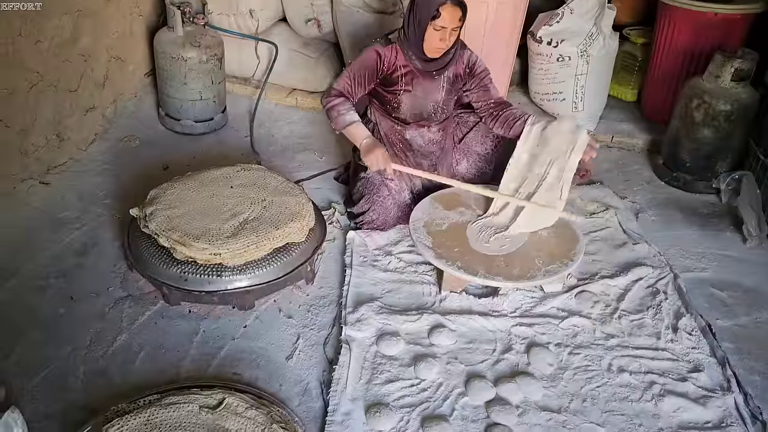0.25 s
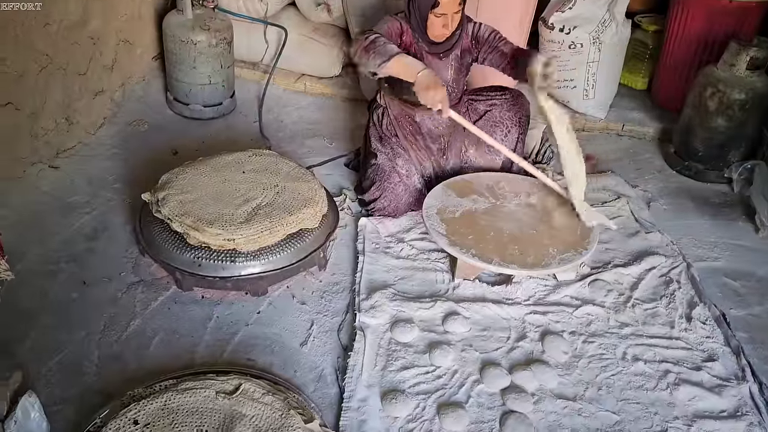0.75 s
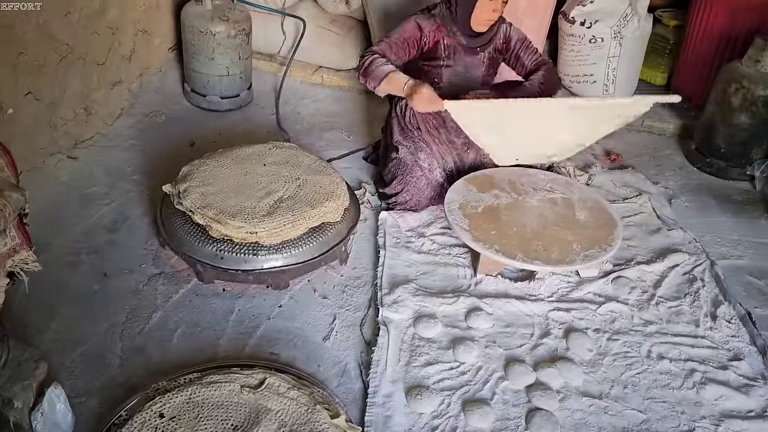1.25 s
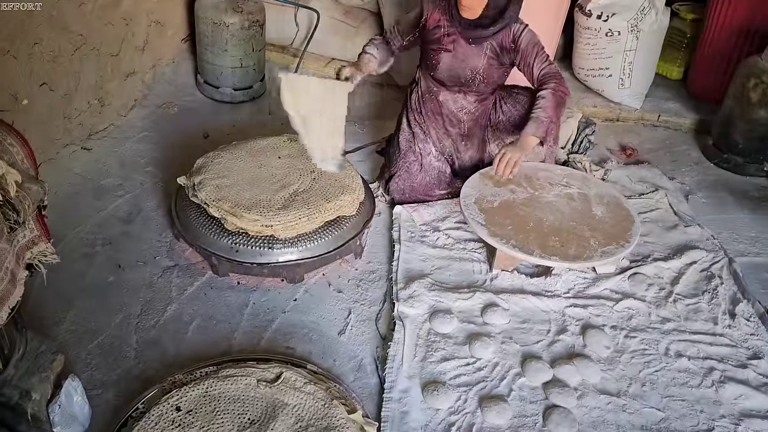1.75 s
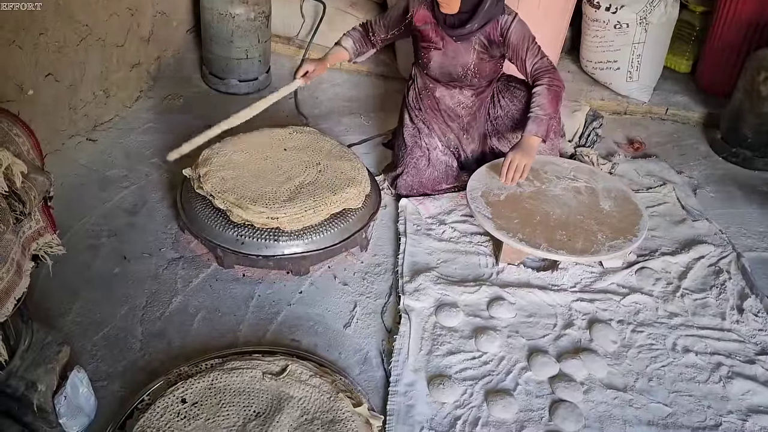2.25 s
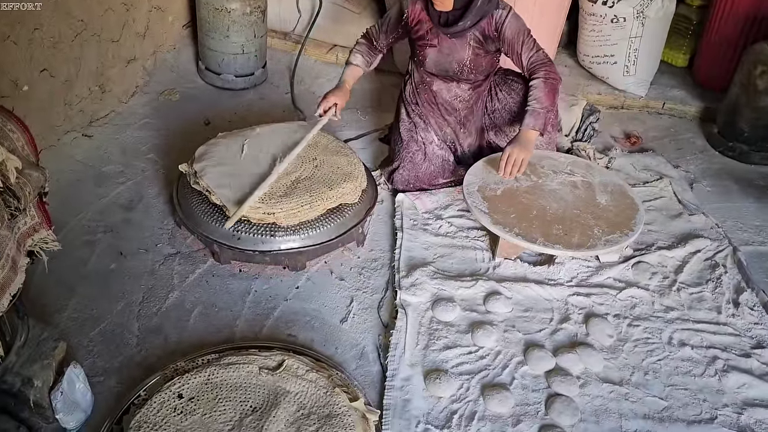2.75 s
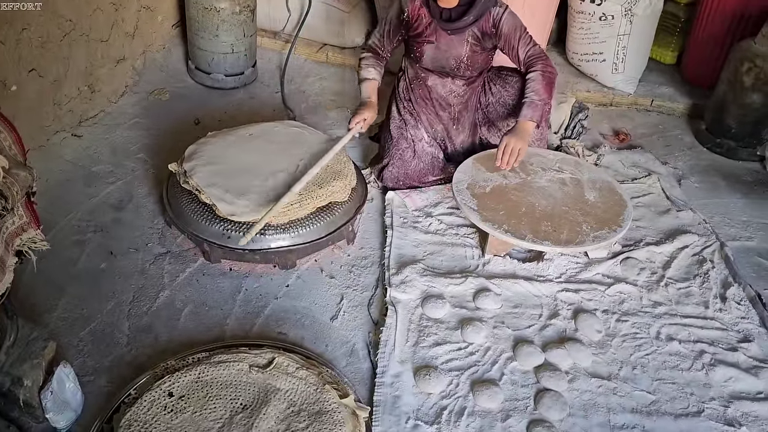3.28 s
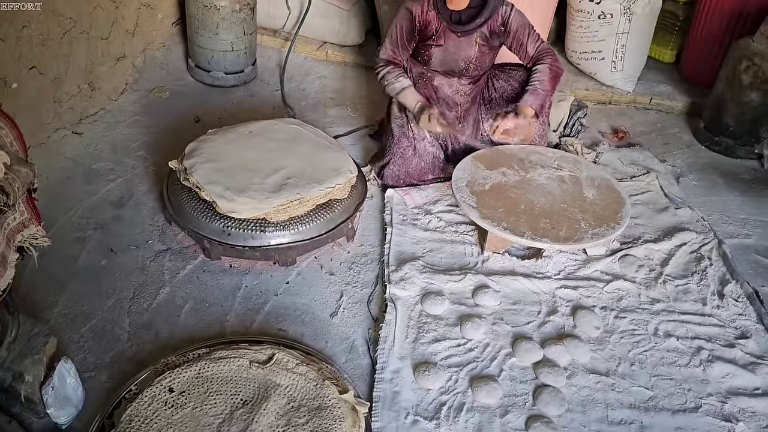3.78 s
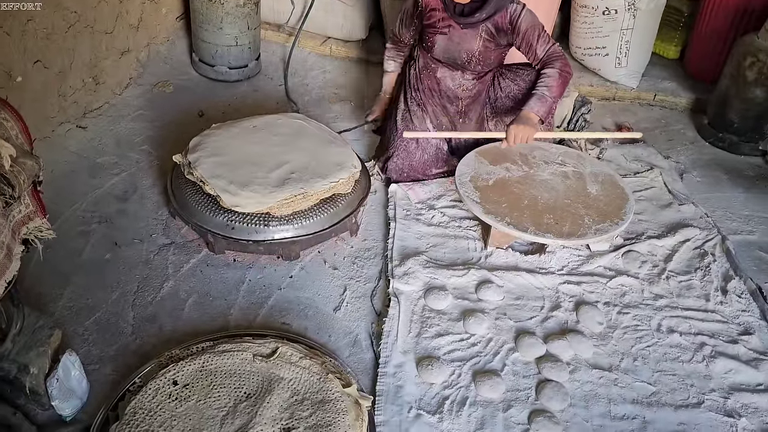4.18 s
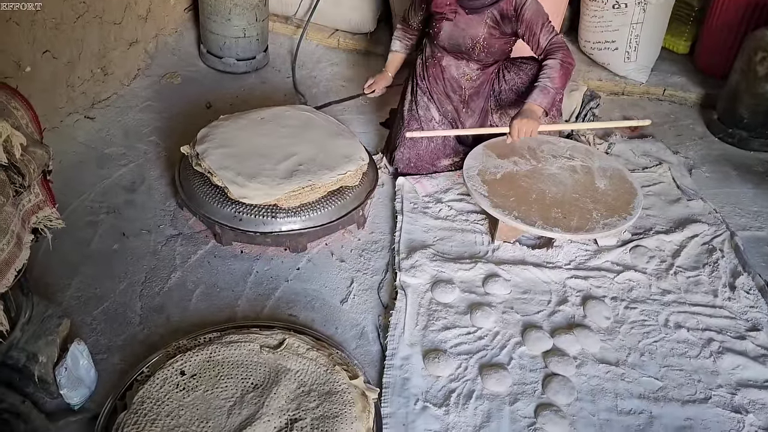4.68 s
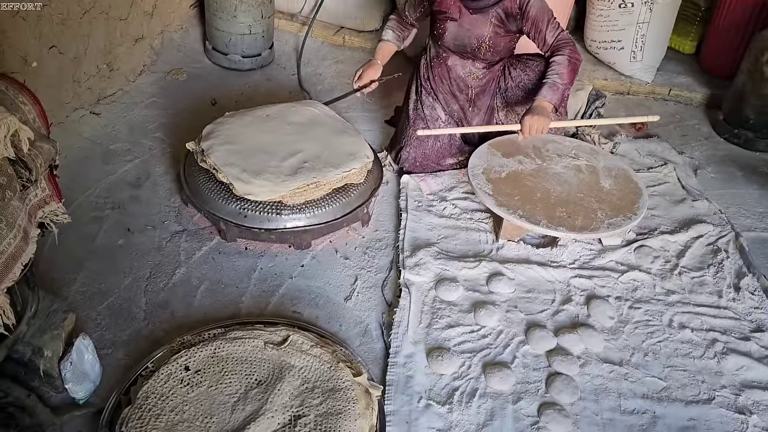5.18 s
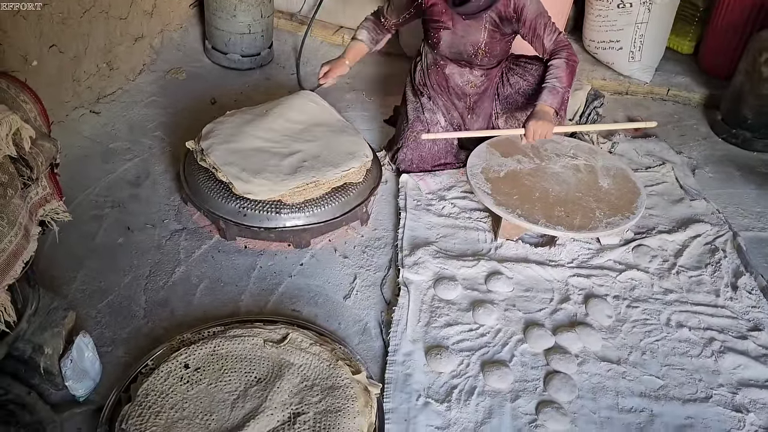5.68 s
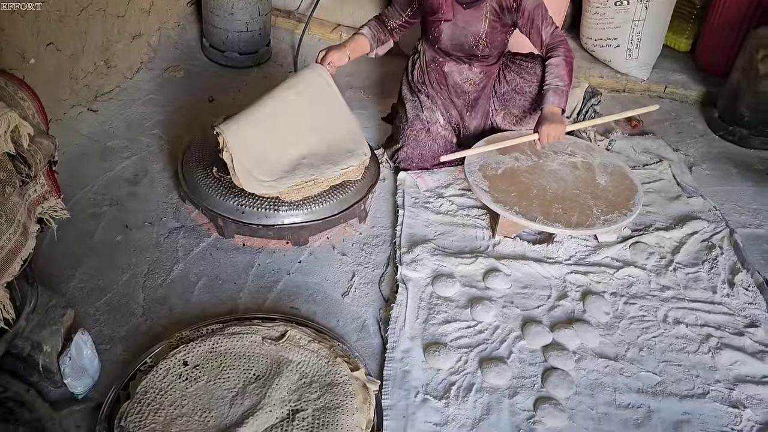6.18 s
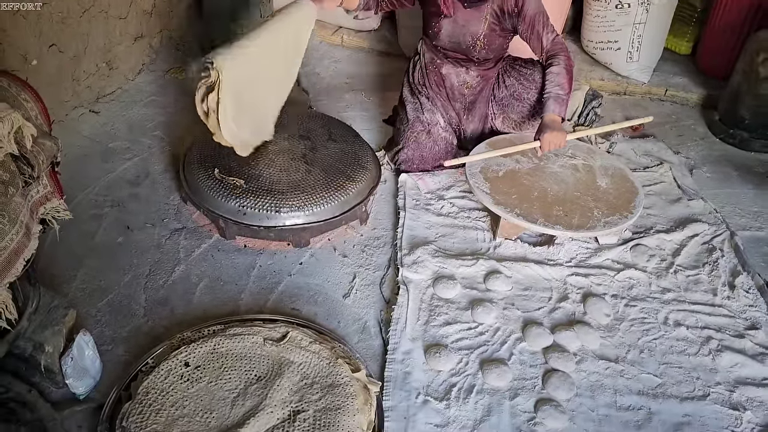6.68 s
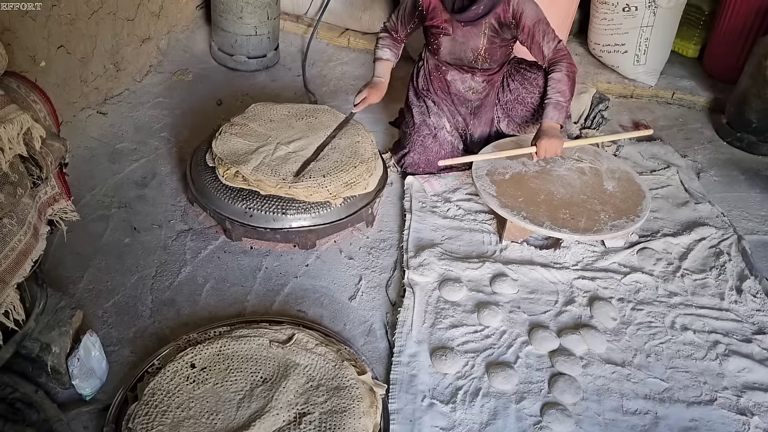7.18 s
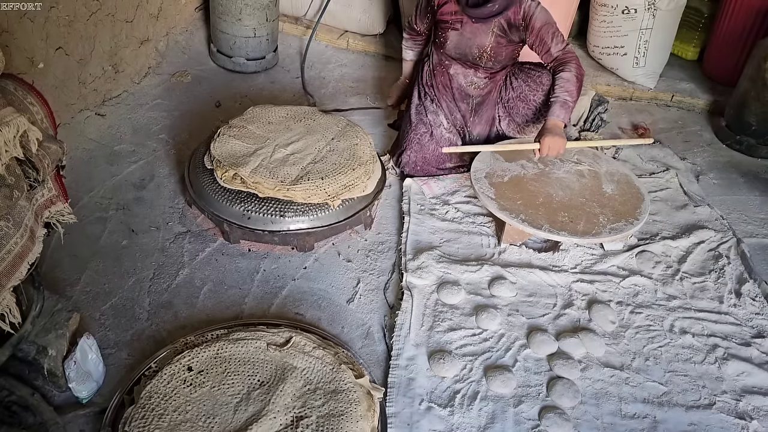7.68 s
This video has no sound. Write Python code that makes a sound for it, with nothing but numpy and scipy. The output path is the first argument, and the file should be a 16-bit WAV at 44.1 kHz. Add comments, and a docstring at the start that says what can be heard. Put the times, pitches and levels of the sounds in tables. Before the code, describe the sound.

In a small hard-walled room with a faint steady gas flame, a thin rolling pin knocks a board and floury dough rustles. A sheet flops softly onto bread, and the pin is set down with dull bumps. A metal blade clanks on an iron griddle and scrapes harshly, making it drone. The bread stack drags up, flaps, then lands with the loudest slap and thump; the blade slides out. Close stereo pickup, bright detail leaning left.

```python
"""Flatbread on a domed iron griddle in a small hard-walled room; a gas burner, coloured noise, runs throughout.
A thin rolling pin knocks on its board (crack plus ringing modes) amid faint ticks of rustling dough; a sheet of
dough slides and flops onto the stack of bread (random grains), the pin ticks the rim and is put down with dull bumps.
A blade strikes the griddle, scrapes under the stack (stick-slip grains) and sets the dome droning. The stack
is dragged up, turned over and lands with a slap and a thump; the blade is drawn out and laid aside."""
import sys
import numpy as np
from scipy import signal
from scipy.fft import rfft, irfft
from scipy.io import wavfile
from scipy.ndimage import uniform_filter1d

SR = 44100
rng = np.random.default_rng(int(sys.argv[2]) if len(sys.argv) > 2 else 0)


def store_wav(level_fs):
    """Save 16-bit WAV to argv[1]."""
    pcm = np.round(np.clip(np.atleast_2d(level_fs), -1, 1) * 32767)
    wavfile.write(sys.argv[1], SR, pcm.T.astype(np.int16))


N = 350138
TIME = np.arange(N) / SR
RING_TIME = np.arange(SR) / SR


def amp(db):
    """Decibels to gain."""
    return 10 ** (np.asarray(db) / 20)


def unit(x):
    """Scales to an rms of one."""
    return x / np.sqrt(np.mean(x ** 2) + 1e-20)


def read(points, hz):
    """Reads a table along log frequency."""
    point_hz, value = np.transpose(points)
    return np.interp(np.log(hz + 1), np.log(point_hz + 1), value)


def level(rows):
    """A dB curve as a gain over time, silent outside its rows."""
    time_s, db = np.transpose(rows)
    inside = (TIME >= time_s[0]) * (TIME <= time_s[-1])
    return amp(np.interp(TIME, time_s, db)) * inside


def add(mix, start_s, sound):
    """Mixes a sound in at start_s."""
    part = mix[round(start_s * SR):][:len(sound)]
    part += sound[:len(part)]


def colour(x, points):
    """Causal minimum-phase filter with the given spectrum; output has unit rms."""
    log_gain = np.log(amp(read(points, abs(np.fft.fftfreq(4096, 1 / SR)))))
    taps = np.fft.ifft(np.exp(np.conj(signal.hilbert(log_gain)))).real
    return unit(signal.oaconvolve(x, taps)[:len(x)])


def resonate(x, resonances):
    """Passes x through parallel resonances."""
    out = 0
    for hz, width_hz, db in resonances:
        b, a = signal.iirpeak(hz, hz / width_hz, SR)
        out = out + amp(db) * signal.lfilter(b, a, x)
    return out


def ring(modes):
    """Dying modes of a struck body."""
    out = 0
    for hz, db, t60_s in modes:
        decay = np.exp(-np.log(1000) * RING_TIME / t60_s)
        out = out + amp(db) * decay * np.sin(2 * np.pi * hz * RING_TIME)
    return unit(out)


def grains(per_s, spread_db):
    """Tiny random slips, a few much larger than the rest."""
    size = amp(spread_db * np.minimum(rng.exponential(1, N), 4))
    sign = rng.choice([-1, 1], N)
    return unit(size * sign * (rng.random(N) < per_s / SR))


def waver(depth_db, size):
    """A random gain, depth_db rms, that drifts over about size samples."""
    return amp(depth_db * unit(uniform_filter1d(rng.standard_normal(N), size=size)))


def stroke(shape, peak_s, db, rise_s, fall_s):
    """Gain of one movement: swells, peaks at peak_s, fades; 20 dB down one rise before and one fall after."""
    away = np.maximum((peak_s - TIME) / max(rise_s, 1e-3), (TIME - peak_s) / max(fall_s, 1e-3))
    gain, near = np.zeros(N), away < 4
    gain[near] = amp(db - 20 * away[near] ** shape)
    return gain


def strokes(rows, shape):
    """Overlapping movements add in power; shape 1 is a pointed swell, 2 round, more a plateau."""
    return np.sqrt(sum(stroke(shape, *row) ** 2 for row in rows))


# likeness of the two channels: hz, likeness_0_to_1
LIKENESS = [(100, 0.93), (300, 0.74), (550, 0.76), (1000, 0.1), (5000, 0.016)]


def diffuse(pair):
    """Two unrelated signals become a field that is alike at both microphones in the bass."""
    a, b = rfft(pair)
    same = np.clip(read(LIKENESS, np.fft.rfftfreq(pair.shape[1], 1 / SR)), 0, 1)
    return irfft(np.array([a, same * a + np.sqrt(1 - same ** 2) * b]), pair.shape[1])


# decay of the reflections: hz, t60_s
ROOM_T60 = [(300, 0.76), (800, 0.2952), (5000, 0.0526), (14000, 0.17)]
# reflected against direct sound: hz, level_db
ROOM_WET = [(100, -10.5), (300, -9), (700, 1.5), (2000, 5)]


def room(x, early_db=4, early_s=0.0086, gap_s=0.0023):
    """Direct sound, dense reflections from floor and near walls, and a short tail."""
    taps = rng.standard_normal((2, SR)) * (rng.random((2, SR)) < 5000 / SR) * (RING_TIME > gap_s)
    taps = diffuse(taps * (1 + amp(early_db) * np.exp(-RING_TIME / early_s)))
    # each band decays at its own rate
    hz, t, bands = signal.stft(taps, SR, nperseg=256)
    bands = bands * np.exp(-np.log(1000) * t / read(ROOM_T60, hz)[:, None])
    tail = rfft(signal.istft(bands, SR, nperseg=256)[1][:, :SR])
    hz = np.fft.rfftfreq(SR, 1 / SR)
    tail = tail / np.sqrt(uniform_filter1d(abs(tail) ** 2, size=600))
    paths = 1 + amp(read(ROOM_WET, hz)) * tail
    paths = paths / np.sqrt(uniform_filter1d(abs(paths) ** 2, size=240))  # keeps each band's energy
    return signal.fftconvolve(x[None], irfft(paths)[:, :SR // 2], axes=1)[:, :N]


def spread(source, count):
    """A wide contact sounds from several spots, each with its own reflections."""
    return sum(room(source()) for _ in range(count)) / np.sqrt(count)


# noise of a contact: hz, level_db
CRACK_COLOUR = [(40, -4), (165, -12.5), (260, 2), (1000, -3), (4800, -2.5), (8000, -7.5), (15000, -12)]


def blows(rows, modes, crack_s, order=3):
    """Each blow is a short crack plus the body's ring; soft contacts lose their treble."""
    out = np.zeros(N)
    for start_s, level_db, bright_hz, crack_to_ring_db in rows:
        crack = colour(rng.standard_normal(SR) * np.exp(-RING_TIME / crack_s), CRACK_COLOUR)
        b, a = signal.butter(order, min(bright_hz, SR / 2 - 1), fs=SR)
        hit = signal.lfilter(b, a, ring(modes) + amp(crack_to_ring_db) * crack)
        add(out, start_s, amp(level_db) * unit(hit) * np.sqrt(.02))  # level counts over 20 ms
    return out


# burner as heard from the moving microphone: time_s, level_db
BURNER_LEVEL = [(0, -56.5), (1.3, -59), (3.1, -62.5), (7.94, -60.5)]
# gas flame: hz, level_db
BURNER_COLOUR = [(25, -12.5), (78, 1.5), (125, -14), (190, -17.5), (250, -8), (400, -22), (690, -17),
                 (850, -2.5), (1020, -6.5), (1250, -16), (3200, -20), (4300, -17.5), (6000, -27),
                 (16000, -34)]


def burner(flutter_db=0.8):
    """Steady gas flame with a slight flutter, spread through the room."""
    flame = diffuse(np.array([colour(rng.standard_normal(N), BURNER_COLOUR) for _ in range(2)]))
    return flame * level(BURNER_LEVEL) * waver(flutter_db, size=2500)


# pin knocks on board, and faint ticks of rustling dough: start_s, level_db, bright_hz, crack_to_ring_db
KNOCKS_AND_TICKS = [(.4275, -31.5, 3130, 1.5), (.5595, -35.5, 1700, 2), (.622, -51, 6000, 18),
                    (.665, -51, 6100, 19), (.8455, -37, 990, 13), (.928, -53.5, 2600, 21),
                    (.957, -61, 6150, 12), (2.292, -50, 1430, 11)]
# modes of pin and board: hz, level_db, t60_s
BOARD_MODES = [(274, -2.5, 0.16), (530, -7, 0.11), (566, -4, 0.17), (834, 3, 0.077), (1130, -1, 0.051),
               (1366, 7, 0.057), (1876, -1, .055), (2250, -7, 0.073), (2870, -9, 0.061)]


def knocks_and_dough_ticks():
    """Knocks excite the quickly damped modes of pin and board; the faint dough ticks are nearly all crack."""
    return blows(KNOCKS_AND_TICKS, BOARD_MODES, crack_s=0.0047)


# dough, cloth, bread and blade slide: peak_s, level_db, rise_s, fall_s, fizz_to_rustle_db
# dough gathered 0.8 s, unrolled 2.3, pin pulled out 3.0, pin changes hands 3.9, blade drawn back 5.3,
# stack dragged up 6.0, blade drawn out 7.3
SLIDES = [(0.842, -45.5, 0.023, 0.036, -11), (2.3, -55.5, 0.036, 0.09, -16), (2.39, -48, 0.063, .055, -15),
          (2.52, -64, .15, 0.43, -7), (2.96, -59.5, .18, 0.14, -13), (3.3, -56.5, 0.18, 0.1, -9),
          (3.445, -56.5, 0.081, 0.053, -7), (3.867, -51.5, 0.057, 0.083, -4),
          (4.19, -58.5, 0.098, 0.052, -4), (4.345, -70.5, .05, 0.036, 6), (5.29, -61, 0.22, 0.11, 0.5),
          (6.0, -55, 0.16, 0.26, -16), (6.18, -55.5, 0.3, 0.14, -15), (6.508, -47, 0.23, 0.16, -4.5),
          (6.63, -58.5, .08, 0.051, 2), (7.3, -52.5, 0.13, 0.18, -2), (7.54, -46.5, 0.29, 0.19, -1),
          (7.78, -59.5, 0.11, .06, -2)]
# rustle: hz, level_db
SLIDE_COLOUR = [(200, -16.5), (600, -5), (1500, -1.5), (2800, -3), (4500, 1.5), (9000, -8.5), (15000, -22)]
# fizz: hz, level_db
FIZZ_COLOUR = [(3000, -28), (6500, 3), (8500, 0), (15000, -3)]


def sliding(shape=1.75):
    """Floury surfaces slip in a dense rustle, with a treble fizz set for each stroke."""
    rustle_rows = [row[:-1] for row in SLIDES]
    fizz_rows = [(peak_s, db + fizz_db, rise_s, fall_s) for peak_s, db, rise_s, fall_s, fizz_db in SLIDES]
    rustle = strokes(rustle_rows, shape) * colour(grains(per_s=2500, spread_db=3), SLIDE_COLOUR)
    fizz = strokes(fizz_rows, shape) * colour(grains(per_s=5000, spread_db=9.0), FIZZ_COLOUR)
    return rustle + fizz


# dough flops onto the stack, lifted stack bends and flaps: peak_s, level_db, rise_s, fall_s
FLAPS = [(2.295, -50, 0.03, 0.049), (2.408, -55, 0.025, 0.036), (2.49, -57.5, .06, 0.098),
         (6.06, -51, 0.11, 0.25), (6.21, -43, 0.085, 0.061), (6.28, -47, 0.084, 0.063),
         (6.53, -48, 0.26, .18)]
# bending sheets: hz, level_db
FOLD_COLOUR = [(50, -9), (170, -9), (300, -1), (550, -2), (750, -10), (1300, -11.5), (6000, -35)]


def flapping(shape=1.7):
    """Bending dough and bread flap in sparse grains, lower than the rustle."""
    return strokes(FLAPS, shape) * colour(grains(per_s=600, spread_db=2), FOLD_COLOUR)


# pin and blade handled and put down: start_s, level_db, bright_hz, crack_to_ring_db
BUMPS = [(2.45, -48, 500, -1), (4.174, -46, 380, -16), (4.2015, -46.5, 6960, 1.5), (4.2065, -37, 610, 7),
         (4.2245, -34, 403, -10), (4.262, -43.5, 600, -10), (4.336, -44.5, 380, -14),
         (5.335, -47.5, 890, 4.5), (7.778, -46.5, 1370, 20), (7.802, -39.5, 458, 5), (7.838, -44, 400, 5)]
# hollow boom: hz, level_db, t60_s
BOOM_MODES = [(247.7, 0, 0.29), (276.6, 4, 0.27), (330, -16, 0.12), (491, -11, 0.18)]


def bumps():
    """Dull contacts excite a low hollow boom."""
    return blows(BUMPS, BOOM_MODES, crack_s=0.018)


# pin's tip on the griddle's rim: start_s, level_db, bright_hz, crack_to_ring_db
RIM_TICKS = [(2.452, -44.5, 9400, -4.5)]
# modes of the rim: hz, level_db, t60_s
RIM_MODES = [(2110, 0, 0.086), (5070, 4, 0.054), (5200, -2, 0.054), (7390, -7, 0.065)]


def rim_ticks():
    """A light tick excites the high modes of the rim."""
    return blows(RIM_TICKS, RIM_MODES, crack_s=0.01)


# blade strikes or catches on iron: start_s, level_db, bright_hz, crack_to_ring_db
BLADE_HITS = [(4.6185, -26.5, 8700, 1), (4.6358, -32, 5000, -5.5), (4.785, -34, 6000, -3.5),
              (4.8075, -35, 5970, -4), (4.8325, -35.5, 6000, -4.5), (4.9885, -31, 7000, -7.5)]
# modes of blade on iron: hz, level_db, t60_s
BLADE_MODES = [(84.2, -14, 0.3), (236.2, 2, 0.25), (498, -7, 0.24), (830, -5.5, .18), (1310, -38, 0.25),
               (1830, -1.5, 0.055), (1995, 1.5, 0.11), (3009, -22, 0.11), (3290, -12, 0.044),
               (3720, -3.5, .09), (4662, -17, .09), (5330, -6, 0.083)]


def blade_hits():
    """Bright cracks excite the modes of blade and griddle together."""
    return blows(BLADE_HITS, BLADE_MODES, crack_s=0.015)


# blade pushed under the stack: peak_s, level_db, rise_s, fall_s, dome_drone_db (before the drone's trim)
SCRAPES = [(4.76, -54, .07, .05, -43.5), (4.818, -42, 0.063, 0.083, -42), (4.989, -36.5, 0.15, 0.12, -35),
           (5.618, -27, 0.17, 0.16, -30.5)]
# scrape noise: hz, level_db
SCRAPE_COLOUR = [(40, -11), (90, 6), (500, 1.5), (750, -0.5), (1400, 1.5), (4800, -3), (8000, -9.5),
                 (15500, -24)]
# resonances of the scraped iron: hz, width_hz, level_db
IRON = [(513, 35, 4.5), (933, 58, 2), (1245, 41, 3), (1960, 230, -1.5), (2340, 45, -6.5), (4180, 130, -6.5),
        (4784, 65, 3)]


def scraping(iron_db=6, grip_db=2.0, shape=2.4):
    """The blade sticks and slips on crusty iron, which sings along; its grip keeps changing."""
    slips = colour(grains(per_s=800, spread_db=1) * waver(grip_db, size=400), SCRAPE_COLOUR)
    push = strokes([row[:-1] for row in SCRAPES], shape)
    return push * unit(slips + amp(iron_db) * resonate(slips, IRON))


# lifted stack drags over the dome: peak_s, level_db (before the drone's trim), rise_s, fall_s
DRAGS = [(6.06, -58, .12, 0.17), (6.285, -45.5, .13, .14), (6.55, -40.5, .17, .24)]
# resonances of the dome: hz, width_hz, level_db
DOME = [(165.6, 25, -16.5), (237, 5.3, -11), (259.2, 15, 5.5), (265.3, 15.5, 6), (333, 44, -11)]


def droning(trim_db=-1, shape=1.93, stretch=1.32, lag_s=0.0062):
    """Rubbing keeps the dome's low modes sounding; they swell longer and later than the blade's push."""
    rub_colour = [(80, -16.5), (170, 2.5), (340, 0.5), (700, -26.0)]  # hz, level_db
    hum = resonate(colour(grains(per_s=900, spread_db=1.5), rub_colour), DOME)
    steady = hum / np.sqrt(uniform_filter1d(hum ** 2, size=2000) + 1e-12)
    pushes = [(peak_s + lag_s, drone_db, rise_s * stretch, fall_s * stretch)
              for peak_s, _, rise_s, fall_s, drone_db in SCRAPES]
    return amp(trim_db) * strokes(pushes + DRAGS, shape) * steady


# sheets land, bulk first, then loose edges: peak_s, level_db, rise_s, fall_s
LANDING = [(6.968, -18.5, 0.035, 0.038), (6.994, -14.5, 0.017, 0.015), (7.048, -30, 0.062, 0.041),
           (7.095, -40.5, 0.06, 0.19)]
# sheet impacts: hz, level_db
SLAP_COLOUR = [(25, -16), (48, -6), (70, -4), (140, -1.5), (178, -10), (280, 1.5), (400, -13.5), (600, -9),
               (750, -13.5), (2200, -17), (4500, -21), (8000, -27.5), (15500, -39.5)]
# griddle and stand rocked by the weight: hz, level_db, t60_s
STAND_MODES = [(69.2, 2, 0.29), (129, 1.5, 0.29), (201.2, -6, 0.46), (281.2, 9, 0.22), (351, -15, 1),
               (489, -9, 0.59), (596, -5, 0.16), (802, -13, 0.42)]


def slap(start_s=6.958, thump_db=-20, rise_s=0.014, shape=1.6):
    """A flurry of sheet impacts over the thump of the whole stack."""
    out = strokes(LANDING, shape) * colour(grains(per_s=2000, spread_db=2), SLAP_COLOUR)
    thump = ring(STAND_MODES) * (1 - np.exp(-RING_TIME / rise_s))
    add(out, start_s, amp(thump_db) * unit(thump) * np.sqrt(.05))  # level counts over 50 ms
    return out


def scene():
    """All handling sounds in the room, over the burner."""
    dull = room(knocks_and_dough_ticks() + bumps())
    soft = spread(lambda: sliding() + flapping(), count=2)
    iron = room(rim_ticks() + blade_hits())
    rubbing = room(scraping() + droning())
    return burner() + dull + soft + iron + rubbing + room(slap())


# left against right: hz, left_minus_right_db
BALANCE_DB = [(100, 0.45), (500, 1.1), (1000, 2.3), (2000, 7.4), (4500, 5.8), (8000, 1.9), (13000, 2.4)]


def record(dry, right_lag_s=.00006, edge_hz=15850):
    """The left microphone hears the scene sooner and with more treble than the right; then the band limit."""
    hz = np.fft.rfftfreq(N, 1 / SR)
    lean_db = read(BALANCE_DB, hz)
    left = amp(lean_db / 2)
    right = amp(-lean_db / 2) * np.exp(-2j * np.pi * hz * right_lag_s)
    heard = irfft(rfft(dry) * np.array([left, right]), N)
    lowpass = signal.firwin(511, edge_hz, window=("kaiser", 9), fs=SR)
    return signal.oaconvolve(heard, lowpass[None], "same")


dry = scene()
out = record(dry)
store_wav(out)
```